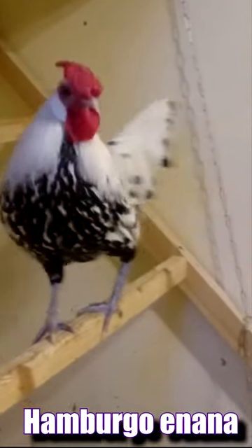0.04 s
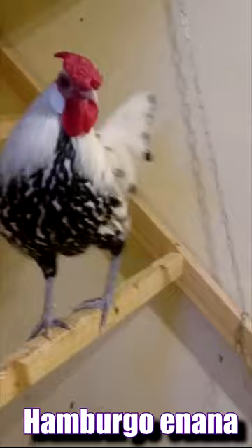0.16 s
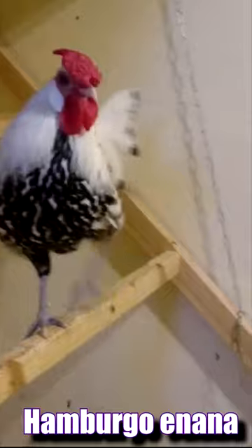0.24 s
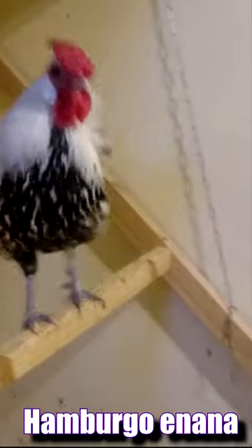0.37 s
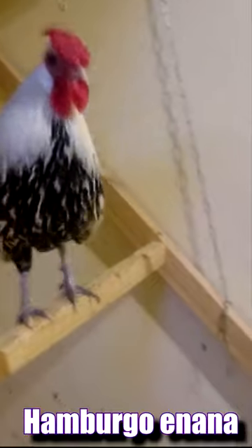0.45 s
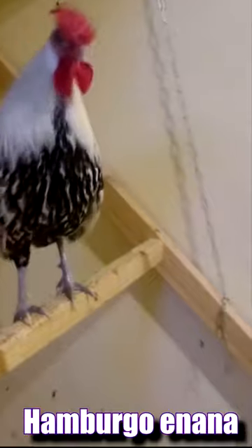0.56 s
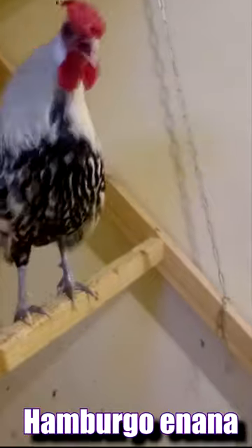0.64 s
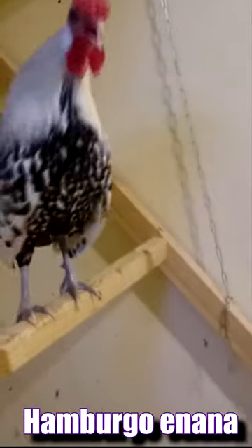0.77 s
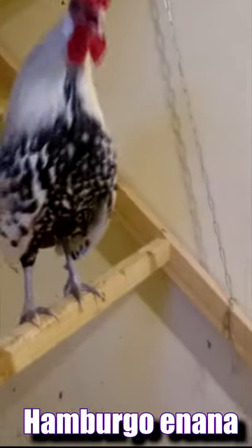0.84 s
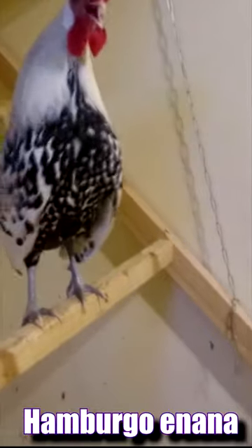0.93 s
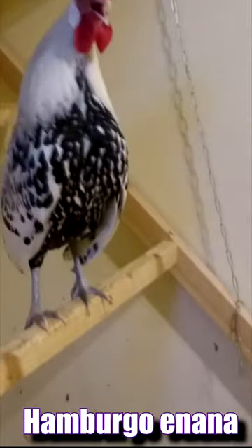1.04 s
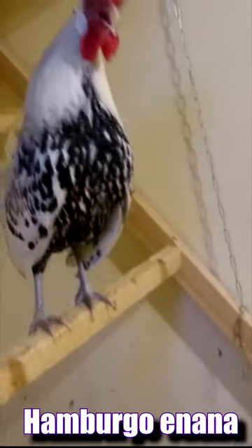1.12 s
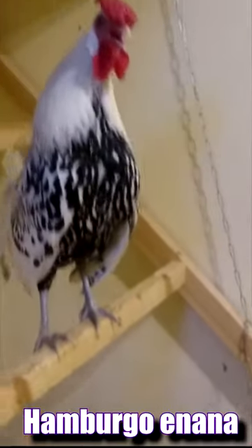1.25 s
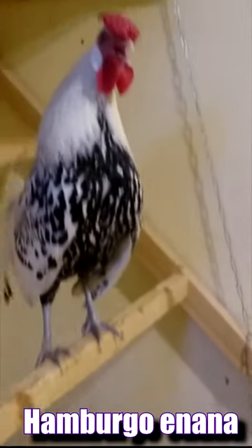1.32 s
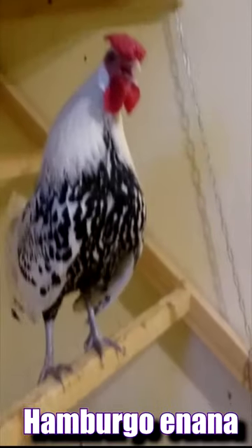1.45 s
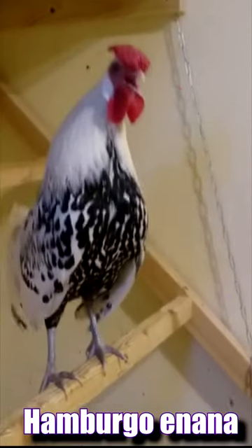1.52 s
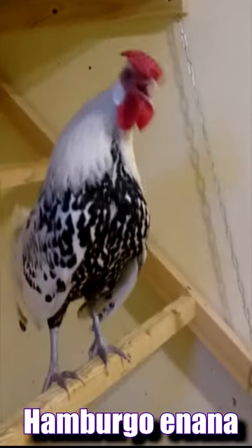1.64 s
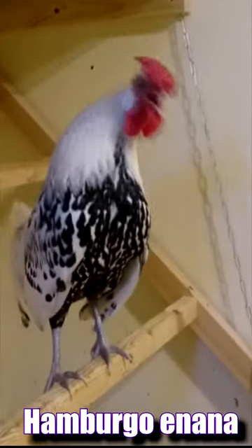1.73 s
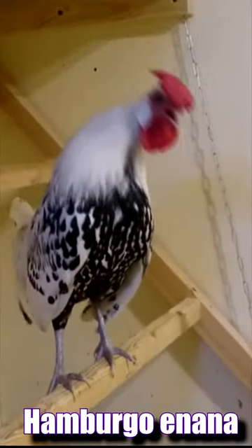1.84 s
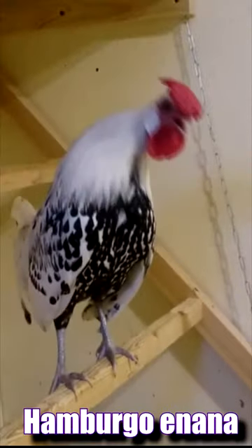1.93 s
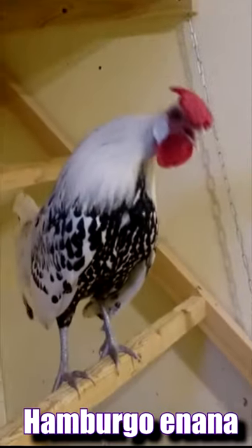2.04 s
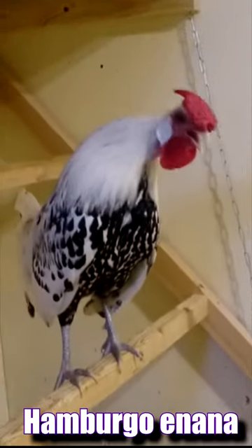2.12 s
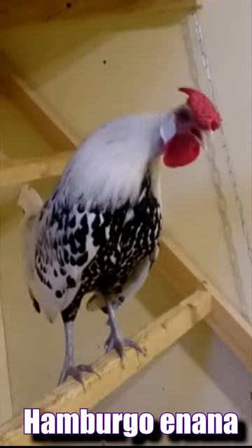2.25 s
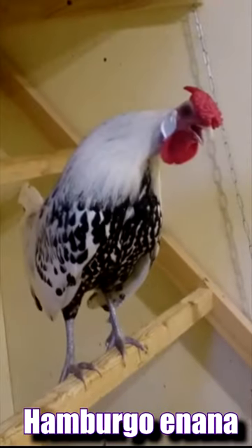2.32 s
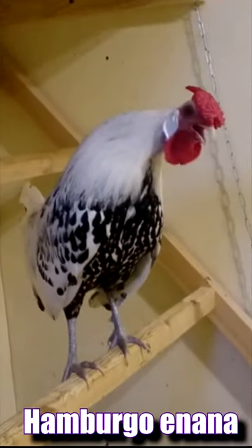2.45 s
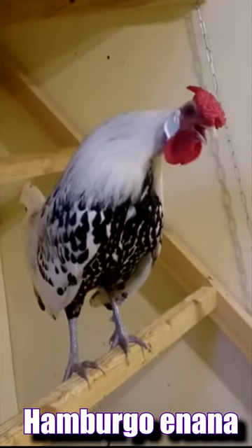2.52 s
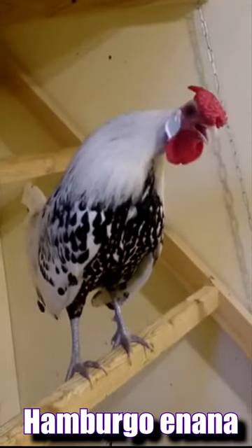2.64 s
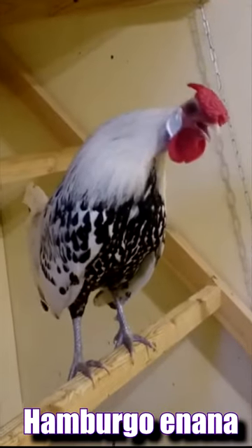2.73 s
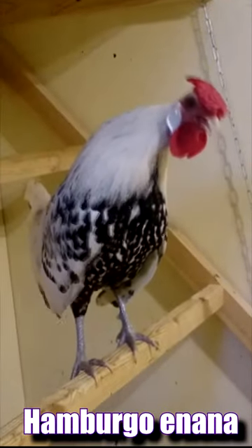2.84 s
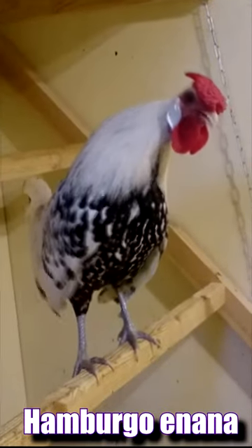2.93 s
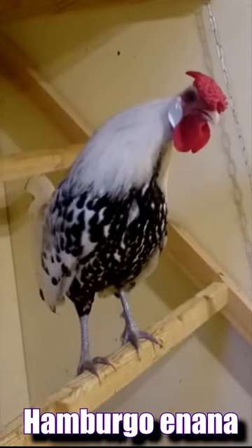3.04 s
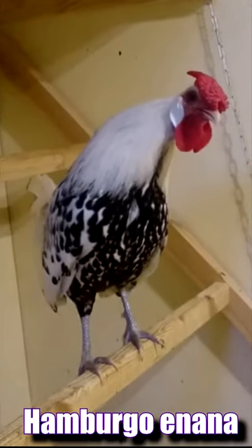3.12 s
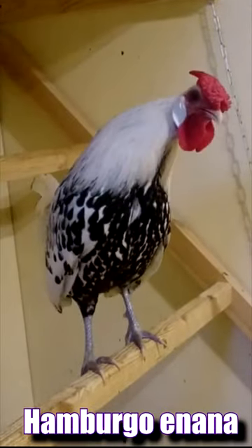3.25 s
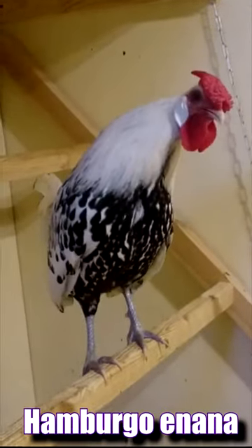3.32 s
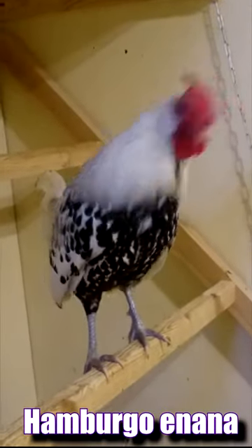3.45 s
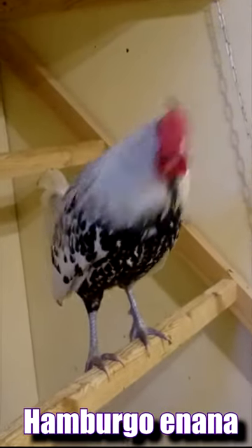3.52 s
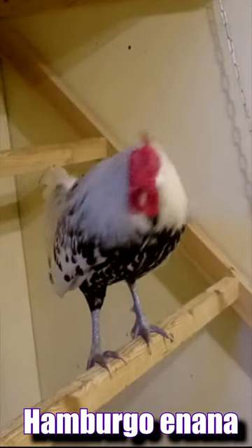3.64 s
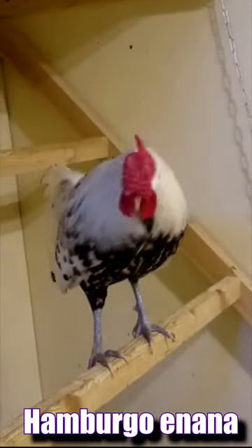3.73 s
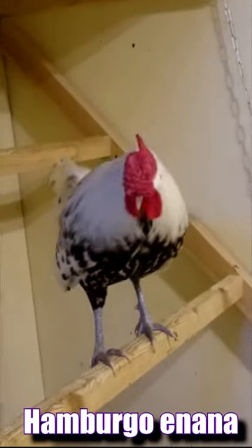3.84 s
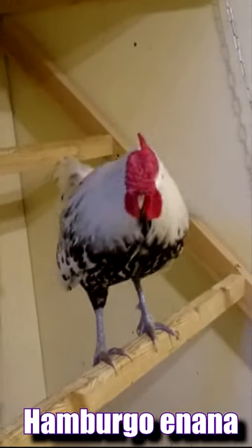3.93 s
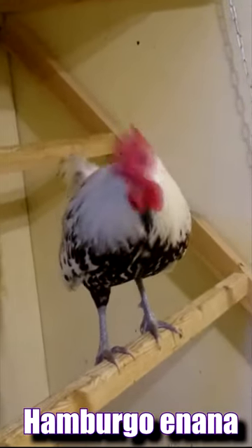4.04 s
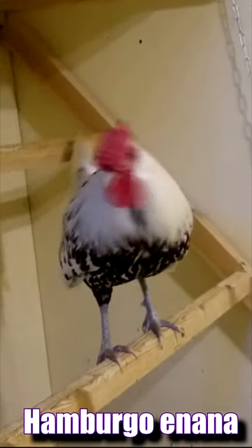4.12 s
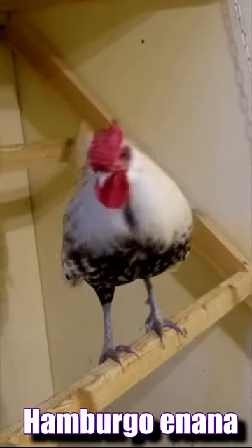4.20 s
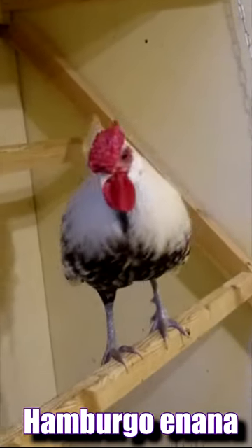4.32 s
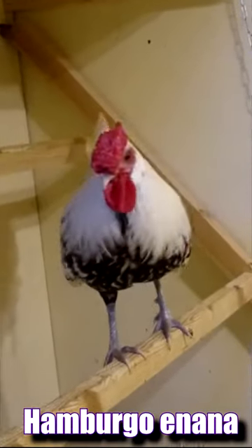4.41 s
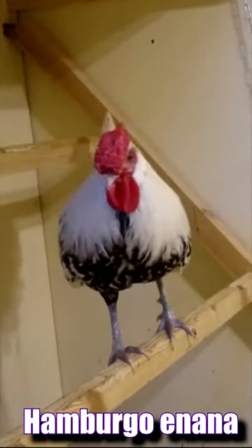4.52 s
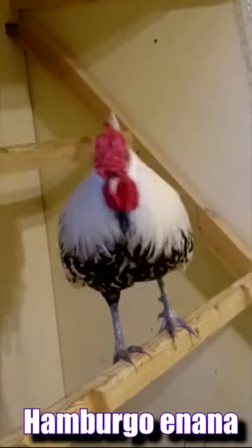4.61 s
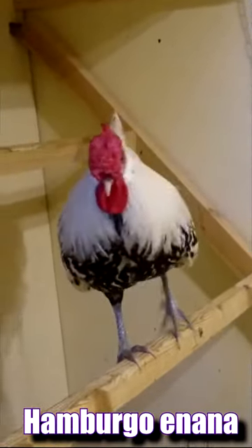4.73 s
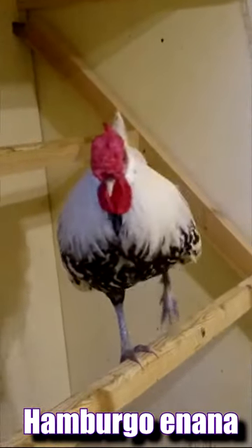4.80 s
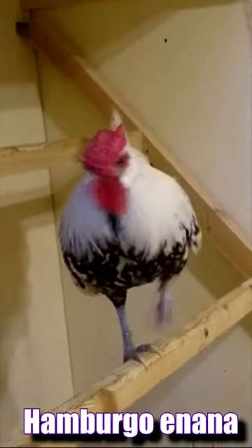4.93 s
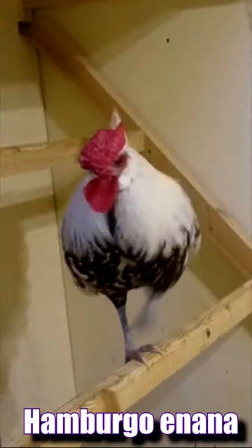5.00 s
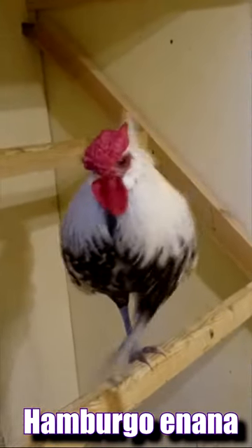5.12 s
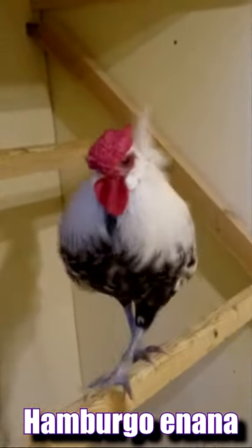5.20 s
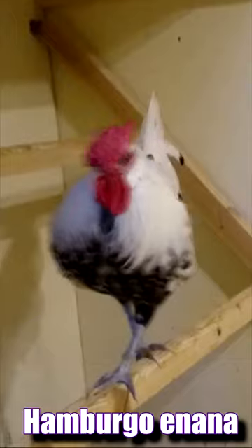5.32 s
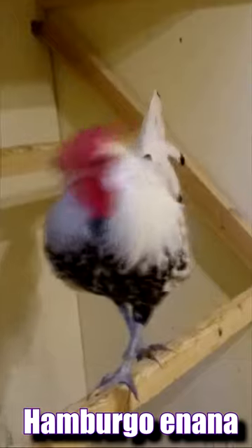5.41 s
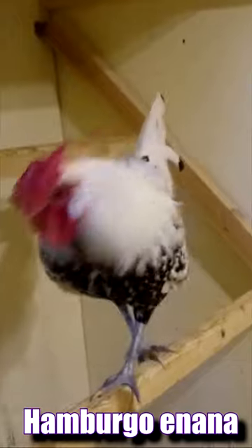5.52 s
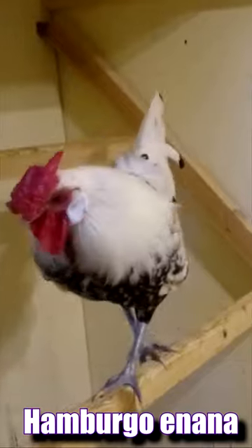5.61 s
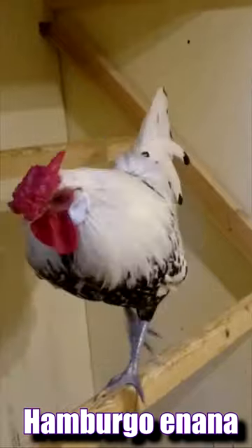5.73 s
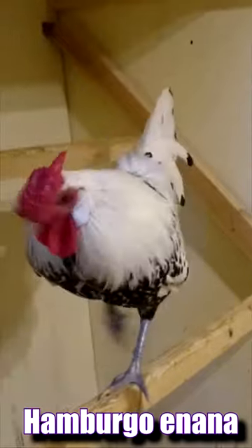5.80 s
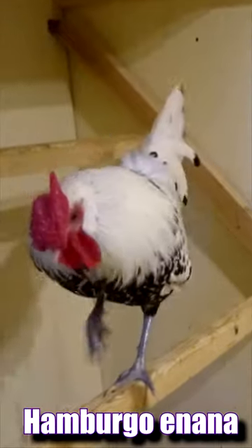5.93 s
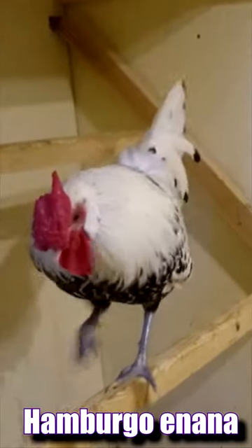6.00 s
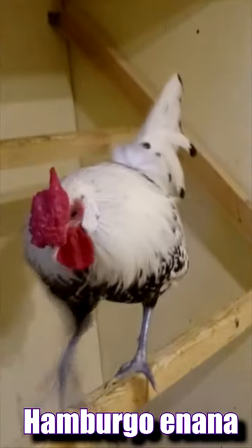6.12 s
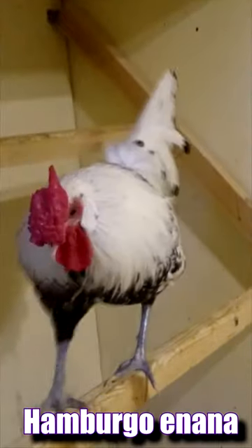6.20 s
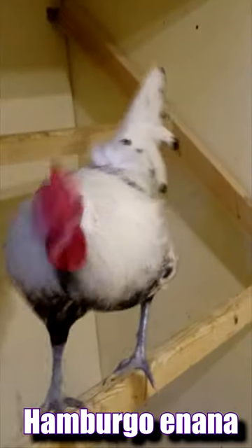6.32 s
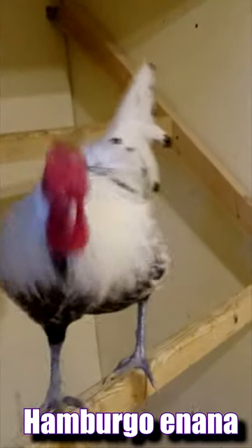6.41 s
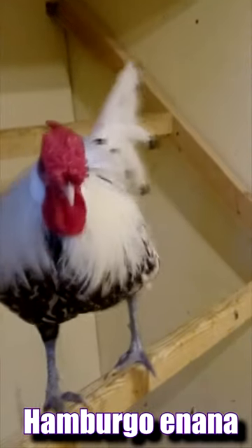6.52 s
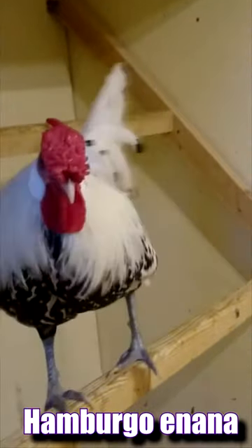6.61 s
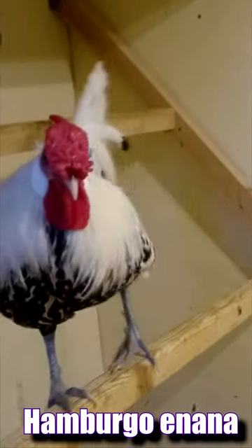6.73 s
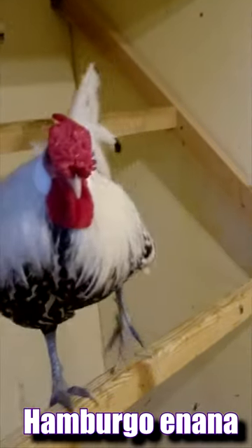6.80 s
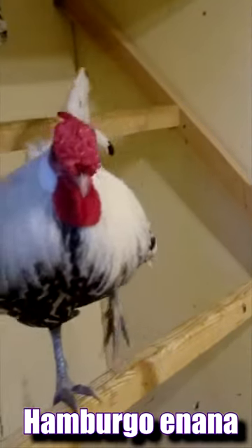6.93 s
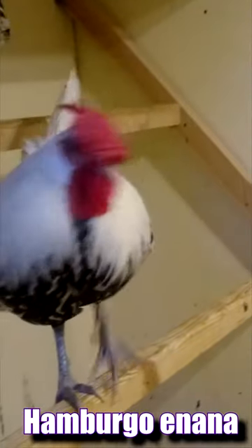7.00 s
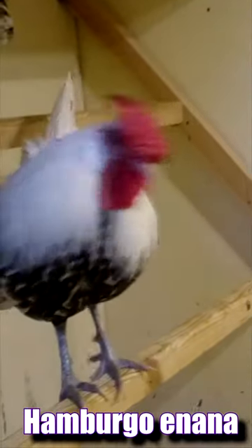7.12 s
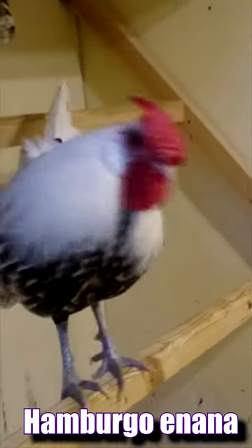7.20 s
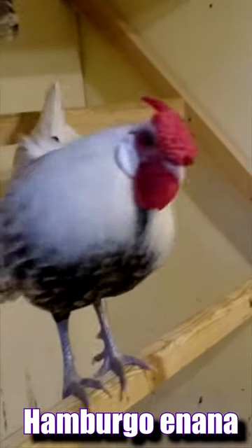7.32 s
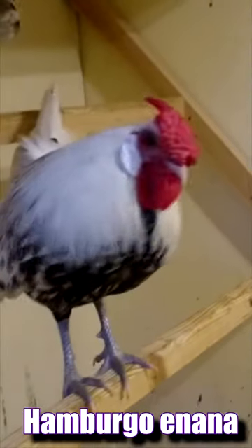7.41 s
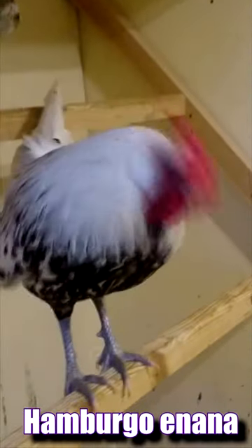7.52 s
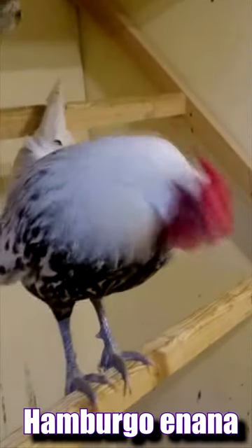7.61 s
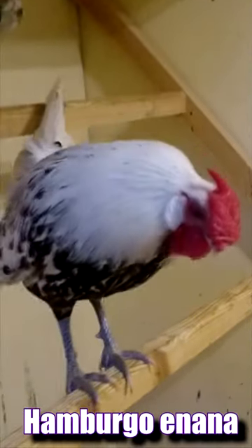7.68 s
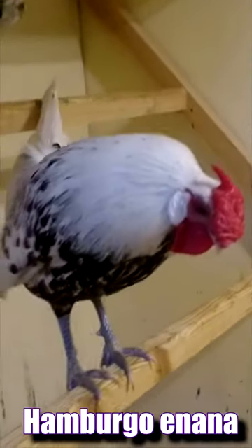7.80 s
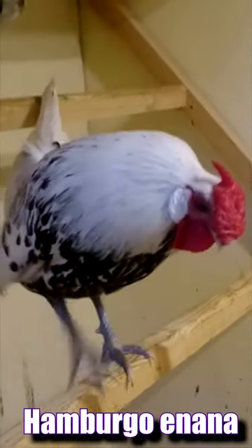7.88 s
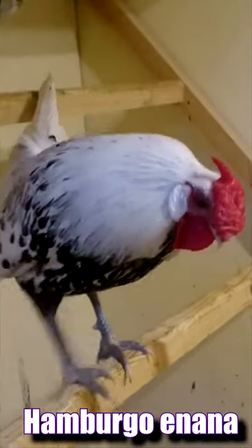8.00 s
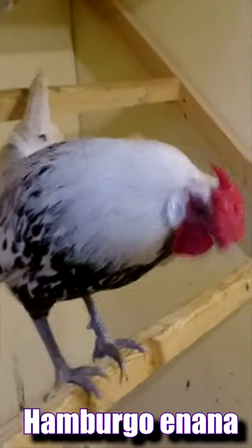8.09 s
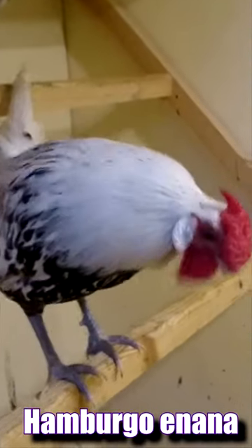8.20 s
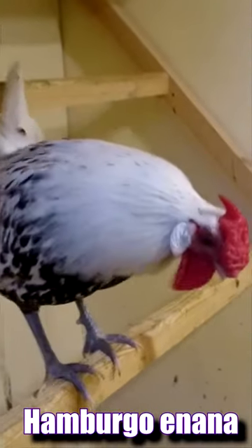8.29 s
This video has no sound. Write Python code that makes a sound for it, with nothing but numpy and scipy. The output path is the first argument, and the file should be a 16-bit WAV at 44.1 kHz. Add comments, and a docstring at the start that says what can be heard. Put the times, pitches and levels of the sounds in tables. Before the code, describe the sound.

Close, hoarse small-rooster crow of three clipped notes and one drawn-out note, followed by quiet dry scratching and light footfalls on wood.

```python
"""A bantam rooster crows once, two short calls and a long one, from a perch in a small wooden coop. Syrinx
harmonics flip between pitch registers and blur when rough; hoarse air rings the windpipe. Before and after,
gritty bursts make claw scrapes and footfalls, and crackling noise makes dry litter. Below lie tonal hum, a soft
drone, microphone hiss and low noise swelling into thumps: puffs of breath during the crow, handling bumps
later."""
import sys
import numpy as np
from scipy import signal
from scipy.fft import rfft, irfft
from scipy.io import wavfile
from scipy.ndimage import uniform_filter1d

SR = 44100
rng = np.random.default_rng(int(sys.argv[2]) if len(sys.argv) > 2 else 0)


def put_to_file(sound):
    """Save the sound as 16-bit audio at rate SR, in the file named by the first command-line argument."""
    columns = np.atleast_2d(sound).T  # one column per channel
    safe = np.clip(columns, -1, 1)
    whole_steps = np.round(safe * 32767)
    wavfile.write(sys.argv[1], SR, whole_steps.astype(np.int16))


N = 368235
T = np.arange(N) / SR

# Pitch, one curve per steady vocal register: (time [s], fundamental [Hz])
PITCH_CURVES = [
    [(0.836, 613), (0.872, 615.8), (0.925, 590)],
    [(0.937, 701), (0.979, 685.6), (1.06, 656)],
    [(1.181, 741), (1.199, 722.2), (1.209, 810), (1.216, 816)],
    [(1.228, 912), (1.254, 923.3), (1.278, 901.4)],
    [(1.286, 899.3), (1.32, 926)],
    [(1.415, 677), (1.438, 676.3)],
    [(1.45, 815), (1.485, 843)],
    [(1.497, 905), (1.523, 931), (1.536, 886)],
    [(1.548, 817.5), (1.575, 855)],
    [(1.587, 923.7), (1.603, 935.6), (1.655, 933.5), (1.699, 902), (1.728, 886)],
    [(1.74, 817), (1.79, 802.2), (1.825, 774.7)],
    [(1.837, 820), (1.861, 793.4), (1.885, 677.4), (1.935, 684)],
    [(1.945, 679), (1.971, 644.3), (1.995, 677.8)],
    [(2.003, 659), (2.061, 679.5), (2.111, 712.3), (2.159, 719), (2.259, 733.5), (2.355, 721.3),
     (2.427, 729.4), (2.453, 735.4), (2.486, 750)],
    [(2.496, 864.4), (2.588, 863), (2.674, 811.6), (2.686, 788), (2.728, 819.5), (2.749, 785)],
    [(2.759, 710), (2.827, 697.4), (2.853, 704), (2.899, 702.3), (2.955, 693.3), (2.979, 668)],
    [(2.987, 661), (3.003, 639), (3.06, 627.3), (3.13, 626)],
]
# Timbre per register: (fundamental [dB], 3rd, 4th and 5th harmonic over the throat colour [dB],
# hoarse air over the overtones [dB], edge over the treble [dB])
REGISTER_TIMBRE = [(-11, -9, -3, 9, 0, -6.5), (-11, 0.5, 4, -9.5, -0.5, -11.5),
                   (-2.5, 6, 0, -1, -9.5, -13.5), (-5.5, 1, -4, -3.5, -20.5, -12),
                   (-6, 10, -3.5, 0.5, -5.5, -10.5), (-8.5, -5, -0.5, -3, -5, 0.5),
                   (-0.5, 0, 5.5, 3.5, -18, -17.5), (-6.5, 0, -7, 1.5, -24, -7),
                   (-3, -3.5, -2.5, 0.5, -19.5, -9), (-9, 0, -0.5, -4, -17, -6),
                   (-2, -4, -16.5, 0, -7, -15.5), (-7, 1.5, -11, -1, 1.5, -9),
                   (-12, -0.5, 4.5, -6, -2, 2.5), (-3, -2.5, -0.5, 1.5, -19.5, -18.5),
                   (-3.5, 0, -10, -13, -20, -26.5), (-3, -10.5, -3.5, 7, -21.5, -15.5),
                   (-7.5, -8.5, 1, -27, 1, -42)]
# Disorder per register: (roughness of low harmonics [0-1], roughness of upper harmonics [0-1])
REGISTER_ROUGHNESS = [(.2, .85), (.25, .85), (.3, .8), (.04, .55), (.3, .8), (.3, .75), (.015, .5),
                      (.03, .55), (.01, .45), (.01, .45), (.04, .7), (.8, 1), (.4, .9), (.0005, .1),
                      (.02, .28), (.0005, .12), (.85, 1)]
# Levels through the crow: (time [s], fundamental before timbre [dB], overtones [dB], treble [dB],
# sheen [dB], cut of the 2nd harmonic, which lifts the 3rd to 5th in comparison [dB])
CROW_LEVELS = [
    [(0.834, -46, -38, -47, -79, 0), (0.844, -42, -32, -35.5, -62, 1), (0.856, -31, -24, -29.5, -56, 0),
     (0.88, -33, -28.5, -29, -52.5, -0.5), (0.898, -39.5, -29.5, -36, -59, -4.5),
     (0.922, -33, -28, -40.5, -51, 0), (0.986, -40, -31.5, -46.5, -56, 0.5),
     (0.998, -40, -36.5, -49.5, -53.5, 0), (1.008, -45, -32, -46, -57, 0),
     (1.032, -46.5, -40.5, -58, -59, 0), (1.065, -50, -55, -56, -60.5, 0)],
    [(1.179, -52, -33.5, -49.5, -67.5, 1), (1.193, -29, -23.5, -31, -54.5, 1),
     (1.203, -23, -21, -29, -46, 0), (1.217, -19.5, -24, -23, -42, 0.5), (1.235, -21, -15, -31, -41, -0.5),
     (1.277, -25.5, -16.5, -32.5, -46.5, 1), (1.297, -15.5, -26, -36.5, -50, 0.5),
     (1.32, -26, -34.5, -45, -57.5, 0)],
    [(1.411, -34, -31, -49.5, -62, 0), (1.419, -33, -28.5, -35, -57, 0),
     (1.435, -29.5, -19.5, -34.5, -52, 1.5), (1.451, -14, -24.5, -26.5, -47.5, 0.5),
     (1.475, -14.5, -23.5, -30.5, -44.5, 0), (1.489, -16.5, -21, -35.5, -49, 0),
     (1.515, -17.5, -16.5, -38, -44, 0.5), (1.565, -24, -30, -39.5, -48, 1),
     (1.597, -19.5, -19, -37.5, -48, 0.5), (1.633, -29.5, -19.5, -35, -43, 0),
     (1.643, -30, -22.5, -41, -62, 0.5), (1.66, -28.5, -16, -36, -44, 1.5)],
    [(1.665, -28, -21.5, -39.5, -40, -1.5), (1.699, -31, -36.5, -49, -53, 0),
     (1.713, -24, -28, -48, -53.5, 3), (1.743, -23.5, -36, -45.5, -54.5, 1),
     (1.773, -24.5, -34.5, -43, -45, 1), (1.795, -29, -34.5, -48.5, -49.5, -1.5),
     (1.827, -38, -31, -42.5, -45, 0), (1.851, -41, -37.5, -53, -54, 0.5),
     (1.897, -50.5, -56.5, -56.5, -58.5, 0), (1.94, -49, -45, -57, -53, 0.5)],
    [(1.945, -48, -39.5, -54.5, -52.5, -0.5), (2.009, -35, -15, -36.5, -41, 0),
     (2.041, -48.5, -23, -33, -35, -0.5), (2.099, -22, -31.5, -39.5, -31.5, -3),
     (2.165, -26.5, -27.5, -44.5, -31.5, 2.5), (2.235, -24, -32.5, -36.5, -31, 8),
     (2.253, -40.5, -31.5, -39.5, -36.5, -0.5), (2.283, -17, -31.5, -38, -38, -6),
     (2.315, -21.5, -30.5, -37, -35, 1.5), (2.379, -42.5, -32.5, -34, -36.5, 12),
     (2.417, -17.5, -36.5, -31.5, -35, 0), (2.461, -12.5, -30, -49, -34, -6),
     (2.49, -24.5, -27, -29.5, -37, -8)],
    [(2.495, -23.5, -22, -36.5, -39, -0.5), (2.539, -27.5, -21.5, -46.5, -39.5, -6.5),
     (2.671, -21.5, -38.5, -36.5, -37.5, 7.5), (2.691, -22.5, -31.5, -48, -42, -5.5),
     (2.715, -16, -39, -42, -36, -1), (2.751, -34, -31.5, -41.5, -40, -1),
     (2.781, -17, -30, -42, -32.5, -3), (2.791, -19.5, -35.5, -35, -44, -1),
     (2.815, -26.5, -31.5, -46, -33.5, 0.5), (2.857, -20.5, -33.5, -35.5, -46, -3),
     (2.901, -23.5, -35.5, -50, -39, -1.5), (2.961, -23, -36, -41.5, -41, -4),
     (2.97, -30, -40, -35.5, -43, 0)],
    [(2.975, -36, -29, -36, -44, 0), (2.995, -35, -32.5, -56, -44, 0), (3.009, -25, -39.5, -50, -48, -7),
     (3.029, -30, -45, -53, -53, 4), (3.055, -41.5, -53.5, -57, -67, -16), (3.099, -42, -60, -67, -74, -2),
     (3.13, -53, -62, -60, -76, 0)],
]
# Throat colour on the 2nd to 5th harmonics: (frequency [Hz], relative level [dB])
THROAT_COLOUR = [(1230, -26), (1460, -29.5), (1650, -28.5), (1850, -20), (2000, -13), (2170, -32.5),
                 (2500, -40.5), (2750, -24), (2900, -46), (3100, -32), (3300, -47.5), (3600, -37),
                 (3750, -43), (4100, -33.5), (4600, -48.5)]
# Beak colour on the 6th harmonic and up: (frequency [Hz], relative level [dB])
BEAK_COLOUR = [(3600, 1.5), (4400, -1.5), (4900, -27), (6100, -23.5), (6700, -4), (8000, 1), (9300, -5.5),
               (10200, -12.5), (12000, -5), (15300, 0)]
# Windpipe resonances: (centre [Hz], width of the first of two passes [Hz], relative level [dB])
WINDPIPE_MODES = [(820, 120, 12), (1340, 480, 0.5), (1945, 350, 9), (2590, 190, 0.5), (3320, 750, -33.5),
                  (3755, 1100, -8), (4300, 100, -33.5)]
# Upper tube resonances: (centre [Hz], width of the first of two passes [Hz], relative level [dB])
UPPER_PIPE_MODES = [(5710, 430, -5.5), (6584, 210, 8), (7500, 130, 2.5), (7550, 120, -8), (9100, 710, -35)]
# Air hissing past the beak: (frequency [Hz], relative density [dB per Hz])
BREATH_COLOUR = [(3500, -29.5), (4600, -7.5), (6000, -7.5), (7900, 1), (10000, -8.5), (15500, -2)]
# Lower tone from the other half of the syrinx: (time [s], frequency [Hz], level [dB rms])
SECOND_TONES = [
    [(1.222, 818, -17), (1.274, 874.5, -32.5), (1.296, 852, -18.5), (1.335, 867, -35.5)],
    [(1.488, 850.4, -17), (1.5, 843, -13), (1.528, 831, -25), (1.548, 847.4, -15.5)],
    [(1.575, 866, -17), (1.595, 842, -23), (1.637, 840, -30), (1.64, 845, -52)],
    [(1.675, 866, -30), (1.701, 857, -24), (1.725, 859.6, -31), (1.745, 877, -24)],
]
# Claw scrapes and pecks: (time [s], level before trim [dB], centre [Hz], 60 dB decay time [s])
CLAW_SCRAPES = [(0.1017, -58, 6200, 0.11), (0.4459, -62, 7600, 0.06), (0.5313, -40, 5350, 0.044),
                (3.1656, -42.5, 8430, 0.044), (3.6037, -47, 7170, 0.054), (3.6426, -44, 7180, 0.077),
                (3.7448, -42.5, 5840, 0.11), (3.8122, -46.5, 7660, 0.06), (3.969, -38, 7800, 0.062),
                (4.0794, -36, 7730, 0.079), (4.2489, -43, 8100, 0.063), (4.5905, -41.5, 6540, 0.072),
                (4.7498, -40, 7780, 0.062), (4.8948, -37.5, 7890, 0.058), (5.4605, -41, 7500, 0.066),
                (5.9653, -55, 6380, 0.068), (6.0701, -39.5, 1200, 0.054), (6.1294, -37, 7100, 0.072),
                (6.3866, -33.5, 6200, 0.091), (6.4693, -32.5, 7500, 0.025), (6.6852, -42, 6320, 0.075),
                (6.8668, -54, 8020, 0.056), (7.6194, -38, 1860, 0.048), (7.659, -42.5, 4600, 0.065),
                (7.7591, -39, 5870, 0.071), (7.86, -32, 7500, 0.064), (7.889, -36, 7900, 0.096),
                (8.0631, -50, 2950, 0.23)]
# Feet landing on the perch: (time [s], level before trim [dB], centre [Hz], 60 dB decay time [s])
PERCH_STEPS = [(0.103, -41.5, 1920, 0.35), (0.535, -38, 977, 0.11), (3.604, -38, 778, 0.21),
               (4.077, -37, 1650, 0.17), (4.751, -34, 606, 0.33), (5.467, -35, 1660, 0.074),
               (6.071, -54, 1190, 0.081), (6.202, -29.5, 1200, 0.14), (6.687, -39, 972, 0.12),
               (8.071, -50, 796, 0.17), (8.187, -44, 979, 0.13)]
# Stirs of the litter by feet or wings: (loudest time [s], rise [s], fall [s], level [dB],
# fine hiss relative to it [dB], dull body relative to it [dB])
LITTER_STIRS = [(.034, .03, 0.046, -72, -5, -15), (.106, 0.01, 0.084, -64, -18, -5),
                (.33, 0.11, 0.34, -82.5, -25, 12), (.456, 0.033, 0.049, -65, -4, -5),
                (.535, 0.0085, 0.14, -65, 0, -2), (3.168, 0.011, 0.14, -51, -7, -2),
                (3.33, 0.14, 0.23, -60.5, 6.5, -2), (3.62, 0.035, 0.11, -57, -12, 0.5),
                (3.749, 0.021, 0.078, -55, -6, -3.5), (3.82, 0.032, 0.049, -56.5, 5.5, -5.5),
                (3.98, 0.14, 0.21, -46.5, 9.5, -13), (4.08, 0.11, 0.19, -49.5, 8, -15),
                (4.27, 0.078, 0.26, -57.5, 12.5, -12.5), (4.529, 0.067, 0.096, -55.5, 6.5, -14),
                (4.597, 0.011, 0.11, -54.5, 5, -18), (4.79, 0.17, 0.31, -49, 11.5, -13),
                (5.13, 0.14, 0.34, -53.5, 10.5, -13), (5.461, 0.12, 0.23, -52.5, 9.5, -13),
                (5.61, .1, .1, -55.5, 10, -10), (5.81, 0.23, 0.17, -62, 7.5, -8.5),
                (5.972, 0.011, .07, -59.5, -5, -8), (6.129, 0.097, 0.089, -47, 3.5, -3.5),
                (6.3, 0.2, 0.23, -48, 6, -10.5), (6.392, .012, .07, -52.5, -11, 0),
                (6.519, 0.14, 0.078, -57.5, 6.5, -0.5), (6.61, 0.076, 0.074, -57.5, 3, -2),
                (6.7, 0.031, .07, -55.5, -3.5, -3), (6.88, 0.058, 0.074, -60, 1.5, 0),
                (7.1, 0.078, 0.044, -75, -10.5, -1), (7.23, 0.057, 0.031, -69, -30, 5),
                (7.48, 0.053, 0.17, -61, 2, -13), (7.58, 0.11, 0.048, -56.5, 5.5, -12),
                (7.62, 0.04, 0.02, -50.5, 0.5, -20), (7.667, 0.017, .06, -47, -14, -9),
                (7.775, 0.029, .1, -46, -4, -12.5), (7.869, 0.041, 0.098, -44.5, 4.5, -12),
                (7.97, .06, 0.1, -62, 6.5, -10), (8.09, .045, 0.077, -63.5, -4, 5.5)]
# Stalks through the microphone port: (frequency [Hz], relative gain [dB])
STALK_COLOUR = [(2000, -13.5), (4000, -2), (6000, 5.5), (7700, 11.5), (8600, 1.5), (10000, -29),
                (12000, -50)]
# Fine litter hiss: (frequency [Hz], relative density [dB per Hz])
FINE_COLOUR = [(7000, -27.5), (9000, -6), (11000, -4), (14000, -0.5), (15600, 7.5)]
# Steady hum lines: (frequency [Hz], mean level [dB rms])
HUM_LINES = [(100, -86.5), (199.7, -73.5), (237.5, -75), (301, -79)]
# Low thumps, puffs of breath during the crow, handling bumps later: (start [s], length [s],
# level [dB], upper body relative to it [dB])
LOW_THUMPS = [(0.24, 0.057, -64, -13), (0.417, 0.038, -63, -16), (0.505, 0.156, -65, -9),
              (0.73, 0.077, -63, -18), (1.098, 0.062, -78, -9), (1.176, 0.12, -53.5, -4),
              (1.448, 0.076, -47.5, -5.5), (1.948, 0.11, -72, -11), (2.084, 0.062, -78, -7),
              (2.227, 0.036, -66, -11), (2.287, 0.27, -66, -9), (2.75, 0.051, -73, -9),
              (3.059, 0.188, -67, -7), (5.631, 0.037, -71, -11), (6.061, 0.4, -63.5, -6),
              (6.502, 0.081, -71, -12), (7.46, 0.039, -66, -9), (7.531, 0.056, -71, -17),
              (7.822, 0.035, -70.5, -10.5), (7.88, 0.12, -62, -20), (8.042, 0.051, -70, -11)]
# Microphone hiss: (frequency [Hz], relative density [dB per Hz])
HISS_COLOUR = [(150, -34.5), (200, -12), (400, -10), (815, -10.5), (2700, -15.5), (6000, -19.5),
               (7800, -20.5), (8500, -35.5), (12500, -34.5), (13200, -40.5), (15800, -54)]

FLIP_S = .006  # fade on each side of a register flip
SWAY_DB = 0.5  # drift of the 2nd to 5th harmonics
BREATH_DB, RASP_DB = -12.5, 14  # breath over the treble; extra when fully rough
THROAT_CUT_HZ = 290
COOP_T60_S, COOP_DB, COOP_DULL_HZ = 0.19, -7.5, 9500
EDGE_DB, ROUND = -21, 1.2  # dome level after its rise or fall time; power of its shape
HISS_DB, RUMBLE_DB = -71, -81
THUMP_RISE_S, THUMP_FALL_S = 0.017, 0.047  # added to half the thump length
DRONE_HZ, DRONE_WIDTH_HZ, DRONE_DB = 270, 61, -81
LOPSIDED, TOP_HZ = 0.036, 15750


def crow():
    """Syrinx harmonics coloured by throat and beak, plus turbulent air in the windpipe."""
    span = slice(int(.8 * SR), int(3.2 * SR))
    t = T[span]
    size = len(t)
    control, voiced = registers(t)
    hz, first_db, *upper_db, air_db, edge_db, rough_low, rough_top = control
    s, *levels = np.transpose(sum(CROW_LEVELS, []))
    base_db, over_db, treble_db, sheen_db, lift_db = (np.interp(t, s, column) for column in levels)

    jitter = 0.0015 * walk(40, size) + 0.0015 * walk(290, size)
    phase = 2 * np.pi * np.cumsum(hz * (1 + jitter)) / SR
    over, over_power = np.zeros(size), np.zeros(size)
    groups, power = np.zeros((3, size)), np.full((3, size), 1e-9)
    for k in range(1, 25):
        line = harmonic(k, phase, rough_low, rough_top)
        if k == 1:
            first = line * undb(base_db + first_db)
        elif k <= 5:
            shift_db = [-lift_db, *upper_db][k - 2]
            gain = undb(on_log(k * hz, THROAT_COLOUR) + shift_db + SWAY_DB * walk(7.5, size))
            over += line * gain
            over_power += gain ** 2
        else:
            # each upper harmonic swells and fades on its own, as reflections in the coop would make it
            gain = undb(on_log(k * hz, BEAK_COLOUR) + 5.0 * walk(9, size))
            # sort into edge, treble and sheen by frequency
            gain = gain * (np.digitize(k * hz, [6100, 9600, 16500]) == np.arange(3)[:, None])
            groups += line * gain
            power += gain ** 2
    groups /= np.sqrt(uniform_filter1d(power, int(.03 * SR), axis=1))
    edge, treble, sheen = groups

    gust = rng.standard_normal(size) * undb(2.7 * walk(190, size))
    # a rough voice drives the upper tube modes with noise rather than lines
    hoarse = rough_top ** 3
    treble = np.sqrt(1 - hoarse) * treble + np.sqrt(hoarse) * pipe(gust, UPPER_PIPE_MODES)
    top = undb(treble_db) * (undb(edge_db) * edge + treble) + undb(sheen_db) * sheen
    breath_db = treble_db + BREATH_DB + RASP_DB * hoarse ** 2
    breath = undb(breath_db) * colour(gust, BREATH_COLOUR)
    air = undb(air_db) * pipe(gust, WINDPIPE_MODES)
    voice = first + undb(over_db) * (over / np.sqrt(over_power) + air) + top + breath
    voice *= np.sin(np.pi / 2 * voiced) ** 2
    # a small throat radiates no bass
    throat_cut = signal.butter(4, THROAT_CUT_HZ, "highpass", fs=SR, output="sos")
    out = np.zeros(N)
    out[span] = signal.sosfilt(throat_cut, voice)
    return out


def registers(t):
    """Pitch, timbre and roughness jump with each register; the voice fades around each flip."""
    control, voiced = np.ones((9, len(t))), np.zeros(len(t))
    for curve, timbre, rough in zip(PITCH_CURVES, REGISTER_TIMBRE, REGISTER_ROUGHNESS):
        s, pitch = np.transpose(curve)
        edge = np.minimum(t - s[0], s[-1] - t) / FLIP_S + 1
        inside = edge > 0
        control[0, inside] = np.interp(t[inside], s, pitch)
        control[1:, inside] = np.array(timbre + rough)[:, None]
        voiced = np.maximum(voiced, np.clip(edge, 0, 1))
    return control, voiced


def harmonic(k, phase, rough_low, rough_top):
    """One harmonic; cycle-to-cycle disorder widens its line, the higher ones more."""
    size = len(phase)
    share = rough_low + (rough_top - rough_low) * min((k - 1) / 8, 1) ** 2
    share = np.minimum(share * max(k / 10, 1), 1)
    rate = 330 + 30 * k
    smear = (walk(rate, size) + 1j * walk(rate, size)) / np.sqrt(2)
    wobble = np.sqrt(1 - share) + np.sqrt(share) * smear
    return np.sqrt(2) * np.real(wobble * np.exp(1j * (k * phase + k * k)))


def pipe(x, modes):
    """Turbulence ringing in tube resonances, rms 1."""
    return unit(sum(undb(db) * ring(ring(x, f, w), f, 0.46 * w) for f, w, db in modes))


def second_tone():
    """The other half of the syrinx: a lower plain tone that beats with the high register."""
    out = np.zeros(N)
    for table in SECOND_TONES:
        s, hz, db = np.transpose(table)
        edge = np.minimum(T - s[0], s[-1] - T) / FLIP_S + 1
        inside = edge > 0
        t = T[inside]
        tone = np.sqrt(2) * np.sin(2 * np.pi * np.cumsum(np.interp(t, s, hz)) / SR)
        out[inside] += tone * undb(np.interp(t, s, db)) * np.clip(edge[inside], 0, 1)
    return out


def claws():
    """Claws scrape and peck: narrowly coloured grit with plenty of broad crack."""
    return bursts(CLAW_SCRAPES, .25, .5, -9)


def footfalls():
    """Feet land on the perch: broadly coloured grit with a little crack."""
    return bursts(PERCH_STEPS, 0.57, 0.079, -20.0)


def bursts(events, width, crack, gain_db):
    """Short decaying grit, each burst ringing at its own centre over a broad crack."""
    out, t = np.zeros(N + SR), T[:int(.3 * SR)]
    rise = 1 - np.exp(-t / .001)
    # the first touch is a sharper tick than the slide that follows
    tick = 1 + 0.55 * np.exp(-t / 0.0012)
    for s, db, hz, t60 in events:
        grit = rng.standard_normal(len(t))
        burst = (unit(ring(grit, hz, width * hz)) + crack * grit) * tick
        at = int(s * SR)
        out[at:at + len(t)] += undb(db + gain_db) * burst * rise * undb(-60 * t / max(t60, .01))
    return out[:N]


def coop(x):
    """Close plank walls: a dense, dulled noise tail that dies quickly."""
    t = T[:int(.5 * SR)]
    tail = rng.standard_normal(len(t)) * undb(-60 * t / COOP_T60_S) * (t > .004)
    tail = signal.lfilter(*signal.butter(1, COOP_DULL_HZ, fs=SR), tail)
    tail /= np.sqrt(np.sum(tail ** 2))
    return x + undb(COOP_DB) * signal.fftconvolve(x, tail)[:N]


def litter():
    """Dense crackle of dry stalks; small slides flicker separately in nine patches of colour."""
    power = np.zeros((3, N))
    for s, rise, fall, db, fine_db, dull_db in LITTER_STIRS:
        power += np.outer(undb([db, db + fine_db, db + dull_db]), dome(s, rise, fall)) ** 2
    slides = np.zeros(N)
    for hz in 2500 * 1.2 ** np.arange(9):
        slides += band(hz / 1.1, hz * 1.1) * np.sqrt(hz) * undb(3.0 * walk(35))
    stalks = colour(slides, STALK_COLOUR)
    fine = colour(rng.standard_normal(N) * undb(1.2 * walk(260)), FINE_COLOUR)
    dull = band(350, 3500) * undb(1.5 * walk(30))
    return undb(0.57 * walk(40)) * np.sum(np.sqrt(power) * [stalks, fine, dull], axis=0)


def dome(at, rise, fall):
    """Swell to 1 at a moment and die away after it."""
    distance = np.abs((T - at) / np.where(T < at, rise, fall))
    return undb(np.maximum(EDGE_DB * distance ** ROUND, -120))


def rumble():
    """Low noise and its upper body: a wandering bed with a swell for each thump."""
    level = undb(RUMBLE_DB + 2.5 * walk(2.5)) * np.ones((2, 1))
    for s, length, db, upper_db in LOW_THUMPS:
        half = length / 2
        swell = dome(s + half, half + THUMP_RISE_S, half + THUMP_FALL_S)
        level += np.outer(undb([db, db + upper_db]), swell)
    return np.sum(level * [band(30, 110), band(120, 300)], axis=0) * undb(1.3 * walk(12))


def hum():
    """Faint sine lines at fixed pitches, each wavering slightly in level."""
    out = np.zeros(N)
    for hz, db in HUM_LINES:
        out += np.sqrt(2) * undb(db + 0.8 * walk(8.9)) * np.sin(2 * np.pi * hz * T)
    return out


def drone():
    """Noise through two equal resonances: a soft low tone."""
    once = ring(rng.standard_normal(N), DRONE_HZ, DRONE_WIDTH_HZ)
    return undb(DRONE_DB) * unit(ring(once, DRONE_HZ, DRONE_WIDTH_HZ))


def hiss():
    """Steady coloured noise of the microphone."""
    return colour(rng.standard_normal(N), HISS_COLOUR) * undb(HISS_DB)


def undb(db):
    """Decibels to amplitude."""
    return 10 ** (np.asarray(db) / 20)


def unit(x):
    """Scale to rms 1."""
    return x / np.sqrt(np.mean(np.abs(x) ** 2))


def ring(x, hz, width):
    """Resonance with gain 1 at its centre."""
    return signal.lfilter(*signal.iirpeak(min(hz, .45 * SR), hz / width, fs=SR), x)


def band(lo_hz, hi_hz, size=N):
    """Noise between two edges, rms 1."""
    sos = signal.butter(2, [lo_hz, hi_hz], "bandpass", fs=SR, output="sos")
    return unit(signal.sosfilt(sos, rng.standard_normal(size)))


def walk(rate, size=N):
    """Smooth random wander, spread 1; a higher rate [Hz] wanders faster."""
    k = int(SR / rate)
    return unit(uniform_filter1d(uniform_filter1d(rng.standard_normal(size), k), k))


def on_log(hz, points):
    """Read a spectrum table on a log-frequency axis."""
    at, db = np.transpose(points)
    return np.interp(np.log(hz), np.log(at), db)


def colour(x, points):
    """Shape a sound by a spectrum table, rms 1."""
    hz = np.maximum(np.arange(len(x) // 2 + 1) * SR / len(x), 1)
    return unit(irfft(rfft(x) * undb(on_log(hz, points)), len(x)))


def scene():
    """Voice and feet sound inside the coop; litter and background are added without its tail."""
    inside = coop(crow() + second_tone() + claws() + footfalls())
    return (inside + litter() + rumble() + hum() + drone() + hiss())[None]


def record(dry):
    """A slightly lopsided capsule turns loud beating tones into low flutter; the top is cut steeply."""
    bent = dry + LOPSIDED * dry ** 2
    bent = signal.sosfilt(signal.butter(1, 25, "highpass", fs=SR, output="sos"), bent)
    return signal.sosfilt(signal.ellip(16, .3, 90, TOP_HZ, fs=SR, output="sos"), bent)


dry = scene()
out = record(dry)
put_to_file(out)
```